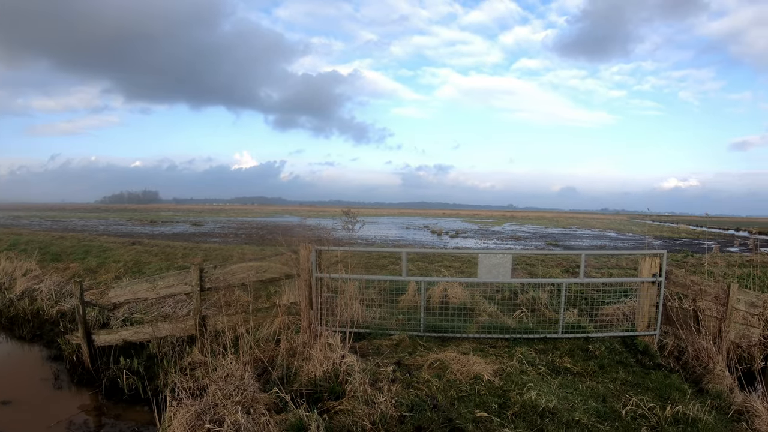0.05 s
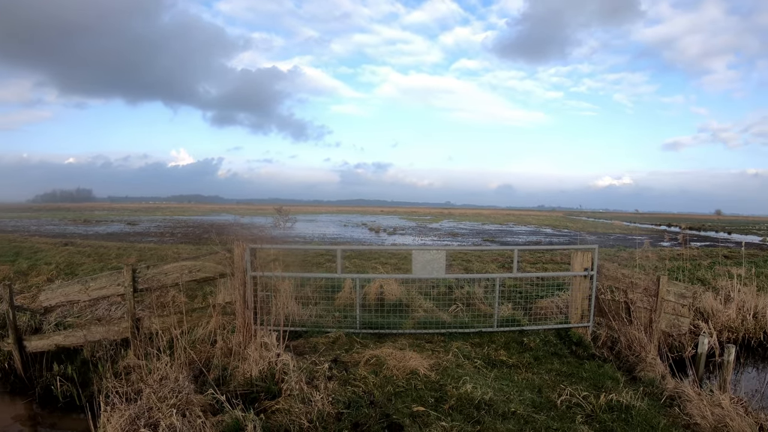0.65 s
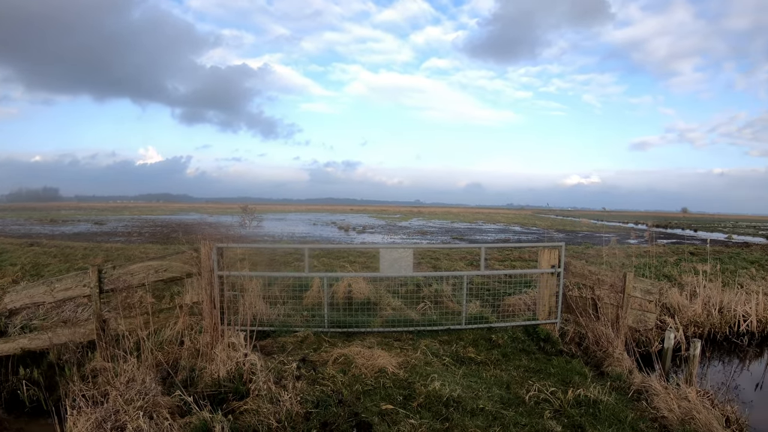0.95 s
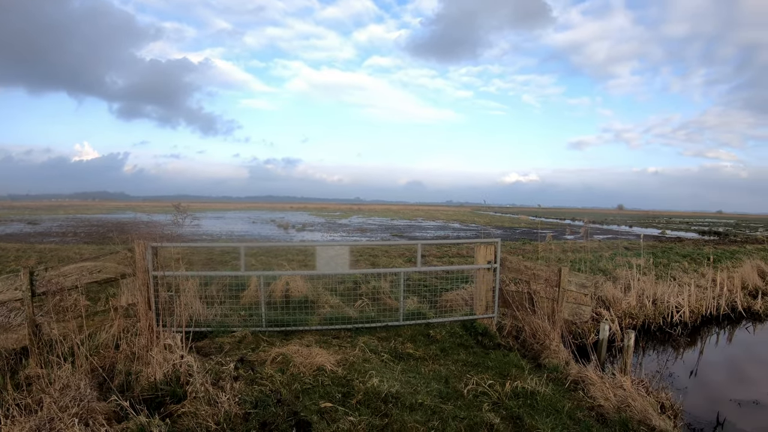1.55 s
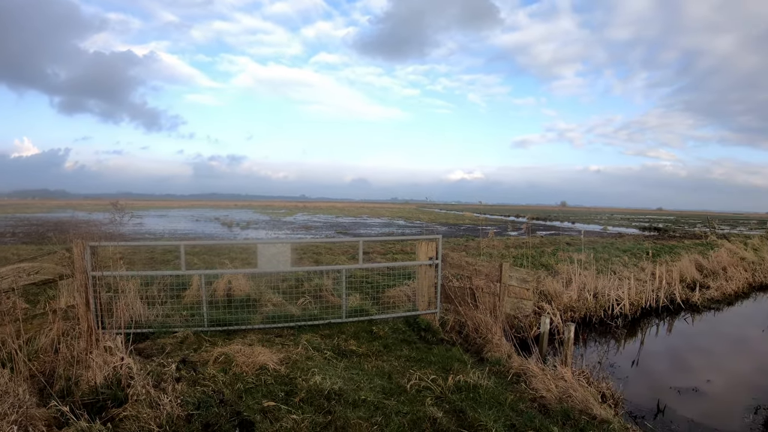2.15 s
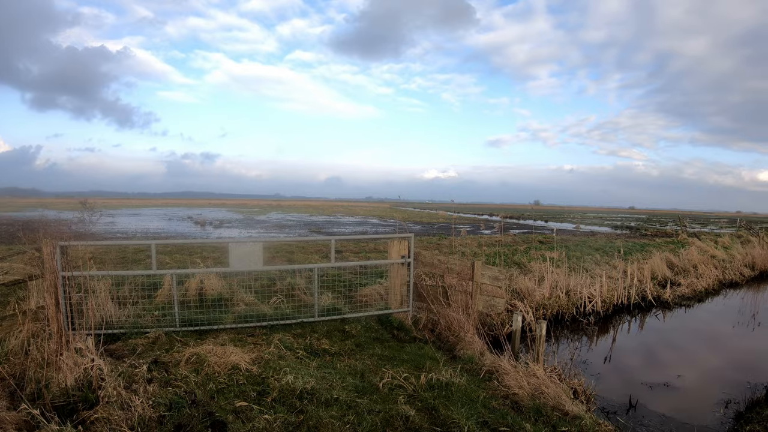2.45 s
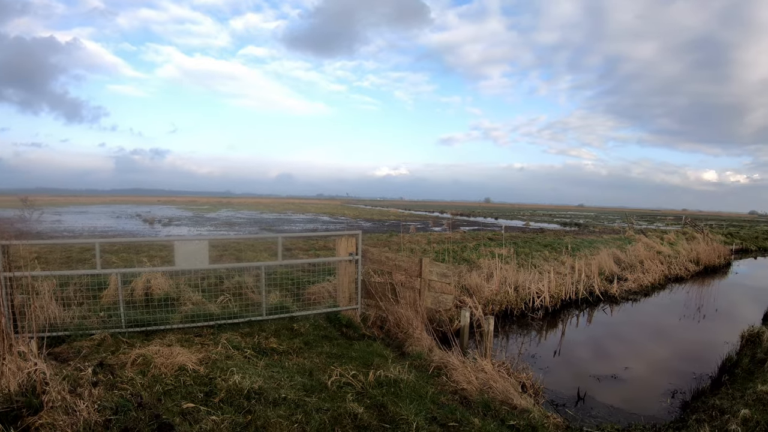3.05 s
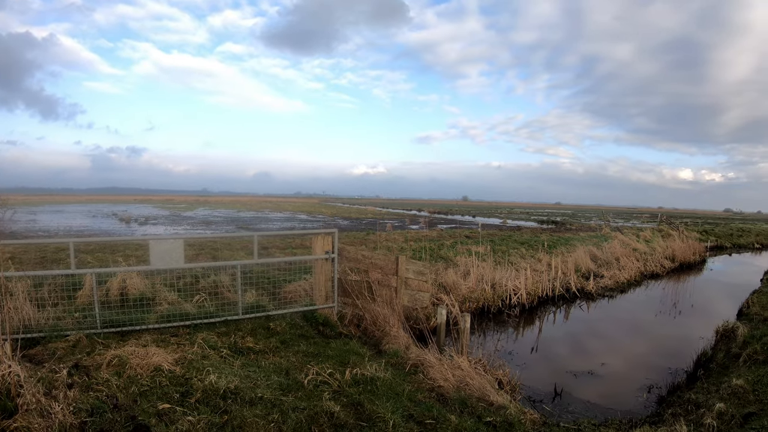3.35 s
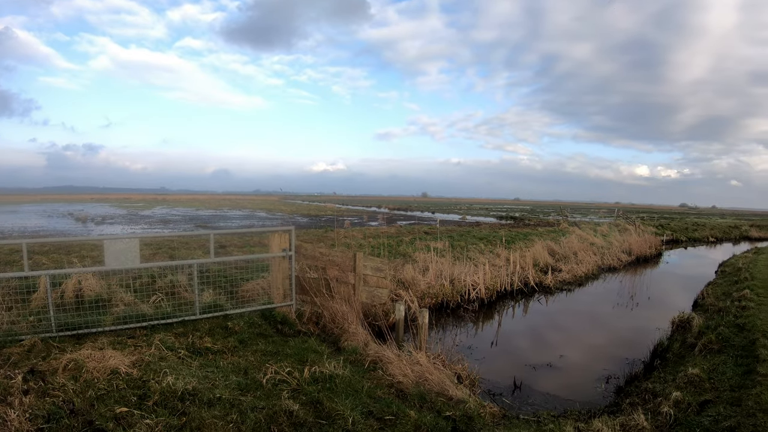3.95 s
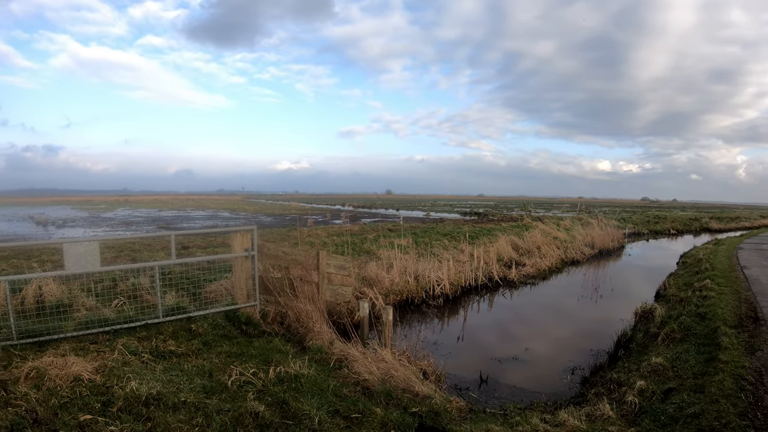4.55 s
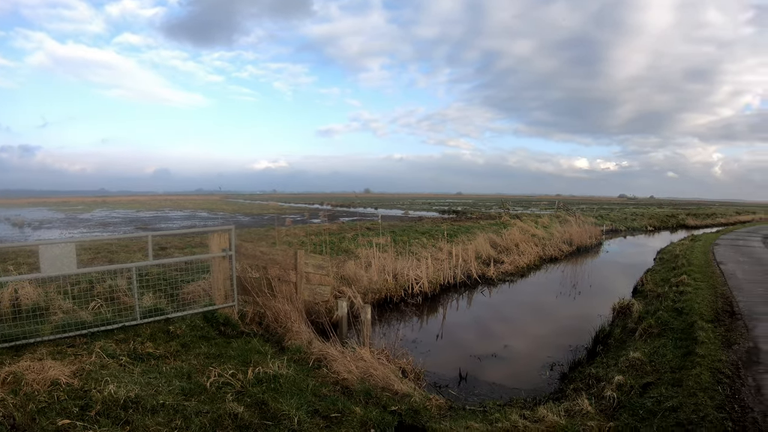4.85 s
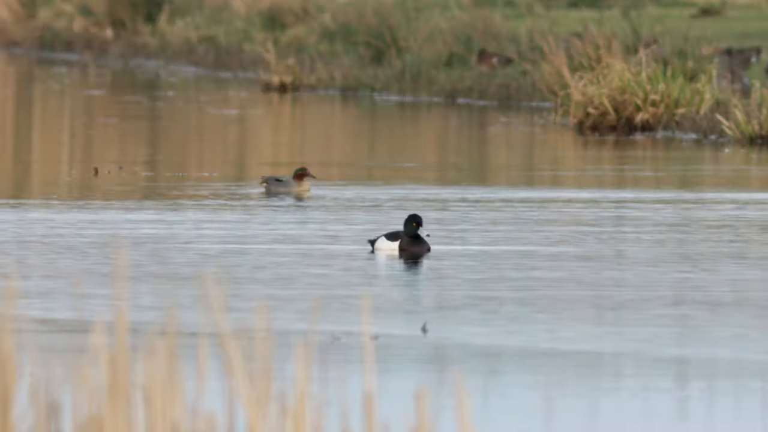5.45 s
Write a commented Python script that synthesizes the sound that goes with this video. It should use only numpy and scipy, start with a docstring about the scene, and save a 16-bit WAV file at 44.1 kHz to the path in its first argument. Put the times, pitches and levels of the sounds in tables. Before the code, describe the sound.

Geese call across wetland in quick, overlapping honks, some harsh, some squeaky, with more of the flock chattering far away. Low bumps knock against the hand-held microphone, mostly on the right and louder than the birds, over a light rumble of wind. The honking thins briefly, picks up again, then cuts off into near silence beside calm water.

```python
"""Geese over a marsh

Geese give short honks: a pulsing voice box rings the throat and beak, rasping at first and clearing as the
pitch falls. More birds murmur far off, over a low hum and a light breeze, and soft bumps shake a hand-held
camera's microphones. Near the end the scene changes to the hush of a still pond."""
import sys
import numpy as np
from scipy import signal
from scipy.fft import rfft, irfft, next_fast_len
from scipy.io import wavfile

SR = 44100
rng = np.random.default_rng(int(sys.argv[2]) if len(sys.argv) > 2 else 0)


def dump_mix(stems):
    """Bounce the given channels to the path in sys.argv[1] as a 16-bit WAV at rate SR."""
    frames = np.atleast_2d(stems).T  # one column per channel
    limited = np.clip(frames, -1, 1)  # hard clip at full scale
    pcm = np.round(limited * 32767).astype(np.int16)
    wavfile.write(sys.argv[1], SR, pcm)


N = 242991
TIME = np.arange(N) / SR
MARSH_END_S, MIC_LAG_S = 5.222, .000102

# the nearby honks: t/s, length/s, top pitch/Hz, level/dB, voice name
NEAR_HONKS = [(0, 0.11, 338.7, -61, "deep"), (0.129, .074, 709, -71.5, "yelp"),
              (0.248, 0.11, 793, -61.5, "yelp"), (0.334, .11, 391, -62.5, "dull"),
              (0.383, 0.097, 373, -64.5, "plain"), (.478, 0.14, 390, -57, "harsh"),
              (0.606, 0.094, 389.6, -59.5, "plain"), (0.71, 0.081, 835, -65.5, "reedy"),
              (0.872, 0.14, 389, -63, "plain"), (.953, .12, 362.6, -54, "nasal"),
              (1.048, 0.12, 396, -66.5, "dull"), (1.179, 0.097, 404, -58.5, "plain"),
              (1.224, .09, 426, -61.5, "plain"), (1.331, .11, 365.5, -54.5, "nasal"),
              (1.472, .108, 417, -57.5, "plain"), (1.678, .122, 368.3, -52.5, "nasal"),
              (1.771, 0.089, 393.4, -55.5, "plain"), (1.834, .067, 410, -63.5, "dull"),
              (2.028, .117, 365, -52, "nasal"), (2.202, .1, 532.6, -59, "plain"),
              (2.281, 0.095, 398.4, -56.5, "plain"), (2.373, .095, 412, -56, "plain"),
              (2.479, 0.097, 780, -65, "yelp"), (2.555, 0.093, 1120, -70, "shrill"),
              (2.62, 0.088, 399.6, -58, "plain"), (2.699, 0.13, 286.8, -59, "deep"),
              (2.91, .12, 393.7, -55, "harsh"), (2.962, 0.078, 1122, -67, "shrill"),
              (3.095, .17, 413, -65.5, "dull"), (3.36, .13, 425, -71, "reedy"),
              (3.515, .16, 419, -68.5, "dull"), (3.646, 0.13, 450, -64.5, "dull"),
              (3.829, 0.16, 840, -71.5, "yelp"), (3.949, 0.14, 451, -71.5, "dull"),
              (4.088, .12, 417, -65, "plain"), (4.194, .073, 417, -71, "plain"),
              (4.31, 0.077, 403, -67.5, "plain"), (4.339, .075, 316, -56.5, "cracking"),
              (4.543, .1, 862, -65.5, "whine"), (4.671, 0.071, 310.6, -59, "cracking"),
              (4.842, .093, 1002, -69.5, "squeak"), (4.893, .068, 309.5, -55.5, "cracking"),
              (4.994, 0.083, 418, -58.5, "plain"), (5.055, 0.072, 1013, -65, "squeak"),
              (5.145, .095, 393, -55, "harsh")]
# goose voices by name: place of the pitch top/0-1, pitch droop, roughness/0-1, throat resonance/Hz,
# its width/Hz, overtone level/dB, beak resonance/Hz, left minus right/dB
GOOSE_VOICES = {"nasal": (0.6, 0.8, .37, 1795, 225, -24, 5600, -10),
                "plain": (0.44, .76, 0.44, 1810, 330, -23.5, 3600, -7),
                "harsh": (0.53, .62, 0.7, 1807, 370, -26, 5900, -9.5),
                "deep": (0.5, 0.7, 0.3, 1800, 520, -37, 3500, -5),
                "dull": (0.3, 0.6, .56, 1468, 290, -23, 5400, -3.5),
                "cracking": (0.36, 0.56, 0.53, 1780, 700, -26, 3000, -9),
                "yelp": (0.63, 0.4, 0.4, 1760, 520, -26.5, 3500, -7),
                "reedy": (0.5, 0.4, .22, 1620, 450, -13.5, 3550, -5),
                "whine": (.12, .14, 0.4, 1620, 450, -12, 5900, -15),
                "squeak": (.5, 0.3, 0.1, 1980, 450, -16.5, 3300, -8),
                "shrill": (.2, 0.5, .14, 2120, 450, -9.5, 4400, -9.5)}
# the clean squeal of a cracking voice: same columns as a goose voice
SQUEAL_VOICE = (0.16, .3, .09, 2380, 950, -22.5, 5400, -10.5)
# how much of the honk's body the beak lets out: f/Hz, level/dB
BEAK_SPECTRUM = [(500, -55), (900, -16), (1250, -0.5), (1600, -0.5), (1850, 0), (2250, -1), (2550, -3),
                 (2750, -10), (3200, -21)]
# how much of the high overtones it lets out: f/Hz, level/dB
OVERTONE_SPECTRUM = [(2500, -17.5), (2950, 6), (3500, 3), (4600, -1), (5700, -2), (6700, -3.5), (8000, -12),
                     (11000, -39)]
# how the far chatter swells and fades: t/s, level/dB
CHATTER_SWELL = [(0, -5.5), (.45, 8), (.8, 1.5), (1.1, 7.5), (2, 0.5), (2.5, 6.5), (3.3, -4), (4.3, 1.5),
                 (5.2, 3.5)]
# bumps on the camera: t/s, level/dB, knock pitch/Hz, relative edge level/dB, relative rebound level/dB
CAMERA_BUMPS = [(0.095, -31.5, 202, -42, -25), (.125, -26.5, 200, -47, -20), (.931, -33, 181, -33, -12),
                (1.078, -21, 199, -13, -19), (1.651, -18.5, 201, -25, -7.5), (2.329, -23, 191, -32, -6),
                (2.339, -31, 189, -45, -23), (2.796, -33, 171, -21, -27), (2.961, -27, 203, -31, -14),
                (3.603, -32.5, 215, -35, -8), (3.638, -37, 215, -35, -16), (3.652, -34.5, 207, -23, -10.5),
                (3.814, -21, 163, -57, -14.5), (4.183, -40.5, 172, -40, -17.5),
                (4.339, -39.5, 199, -35, -8.5), (4.453, -16.3, 221, -10.5, -5.5), (4.514, -32, 250, -32, 0),
                (4.550, -17, 187, -16, -13), (4.725, -40.5, 194, -43, -12)]
# the tone of the open air: f/Hz, level/dB
AIR_SPECTRUM = [(20, 3), (33, 3), (45, 5.5), (65, -8), (110, -11), (170, 4.5), (230, -4), (370, -13.5),
                (540, -19.5), (780, -10), (1050, -22.5), (2000, -28.5), (3500, -39.5), (11000, -44),
                (15500, -53)]
# how alike the air sounds on the two sides: f/Hz, likeness/-1..1
AIR_STEREO_LIKENESS = [(60, -0.28), (110, -0.26), (190, -0.63), (800, -0.83), (1300, -0.4), (2000, -0.047),
                       (3500, 0.014), (16000, -0.015)]
# which side the air is louder on: f/Hz, left minus right/dB
AIR_BALANCE = [(30, -8), (90, -9.5), (140, -.5), (600, -1.5), (2000, -0.5), (8000, -1)]
# the tone of the pond's hush: f/Hz, level/dB
POND_SPECTRUM = [(20, 1.5), (60, -6.5), (300, -10.5), (1300, -16), (4000, -25), (9500, -29.5), (10500, -53)]


def honk(length, pitch, top, droop, rough, throat_hz, width_hz, overtones_db, beak_hz, size=8192):
    """One call: the voice box pulses, unevenly at first, and rings the throat and beak."""
    progress = np.minimum(np.arange(size) / (length * SR), 1)
    rasp = rough * (1.3 - .9 * progress)
    # the pitch scoops up as pressure builds, arches over and sags as it fades
    scoop = .1 * np.exp(-(progress / .16) ** 2)
    arch = 1.005 - droop * (progress - top) ** 2 - scoop - .09 * progress ** 5
    jitter = (.0056 + .03 * rasp) * wobble(size, 200)
    hz = pitch * arch * (1 + jitter + .0058 * wobble(size, 35))
    phase = 2 * np.pi * np.cumsum(hz) / SR
    pulses = unit(sum(np.cos(k * phase + k * k) for k in range(1, int(7500 / pitch))))
    # air hisses once a cycle, and uneven pulses make the voice rough
    hiss = rng.standard_normal(size) * (1 + np.cos(phase))
    source = pulses * (1 + .8 * rasp * wobble(size, 220)) + 2.4 * rasp ** 2 * hiss
    bark = 1 + .33 * np.exp(-((progress - .29) / .17) ** 2)
    swell = np.abs(np.sin(np.pi * progress ** .85)) ** 1.55 * bark
    # as the beak closes, the throat resonance sinks through three positions
    body = 0
    for position, centre_hz in zip(np.eye(3), throat_hz * np.array([1.085, 1, .915])):
        share = np.interp(progress, [.15, .45, .75], position)
        body += shaped(source * swell * share, lambda f: throat(f, centre_hz, width_hz))
    breathy = source + 2.4 * (1.1 + rough) * hiss
    overtones = shaped(breathy * swell ** .93, lambda f: beak(f, beak_hz))
    return (unit(body) + undb(overtones_db) * unit(overtones)) * np.sqrt(length * SR / size)


def throat(hz, centre_hz, width_hz, ring_hz=2530, ring_width_hz=79, ring_db=-19.5):
    """The throat favours one broad band of pitches; a narrow one above it adds a nasal ring."""
    main = 1 / np.hypot(1, 2 * (hz - centre_hz) / width_hz)
    ring = undb(ring_db) / (1 + (2 * (hz - ring_hz) / ring_width_hz) ** 2)
    return undb(read(BEAK_SPECTRUM, hz)) * (main + ring)


def beak(hz, centre_hz, width_hz=680):
    """The beak boosts the overtones near its own resonance."""
    resonance = 1 / (1 + (2 * (hz - centre_hz) / width_hz) ** 2)
    return undb(read(OVERTONE_SPECTRUM, hz)) * (.49 + resonance)


def placed_honk(length, pitch, db, voice):
    """One honk in a given voice, as the two microphones hear it."""
    *timbre, pan_db = voice
    return undb(db) * stereo(honk(length, pitch, *timbre), pan_db, MIC_LAG_S)


def near_geese(crack_after_s=.016, squeal_s=.076, squeal_ratio=4.13):
    """The calls that stand out. A cracking voice adds a squeal about two octaves up."""
    out = np.zeros((2, N))
    for start, length, pitch, db, voice in NEAR_HONKS:
        add(out, start, placed_honk(length, pitch, db, GOOSE_VOICES[voice]))
        if voice == "cracking":
            squeal = placed_honk(squeal_s, pitch * squeal_ratio, db - 4, SQUEAL_VOICE)
            add(out, start + crack_after_s, squeal)
    return out


def far_geese(count=100, level_db=-72, scatter_db=5):
    """Many faint honks from all over the marsh blend into a murmur."""
    out = np.zeros((2, N))
    for k, (when, long, high, rough, bright, loud, side) in enumerate(rng.random((count, 7))):
        call = honk(length=.0803 + .06 * long, pitch=350 * 2 ** (1.3 * high ** 2),
                    top=.3987, droop=.387, rough=.31 + .5 * rough,
                    throat_hz=826 + 700 * bright, width_hz=735, overtones_db=-21, beak_hz=3900)
        placed = stereo(call, pan_db=-1.6, lag_s=MIC_LAG_S * 2 * side)
        add(out, (k + when) / count * MARSH_END_S, undb(scatter_db * loud) * placed)
    return unit(out) * undb(level_db + np.interp(TIME, *np.transpose(CHATTER_SWELL)))


def marsh_echo(x, level_db=-15, fade_s=.23, size=32768):
    """Reeds, banks and water scatter a thin echo back."""
    t = np.arange(size) / SR
    envelope = undb(-60 * t / fade_s) * (1 - np.exp(-t / .0023))
    tail = unit(rng.standard_normal((2, size)) * envelope) / np.sqrt(size)
    return undb(level_db) * signal.fftconvolve(x[1:], tail, axes=1)[:, :N]


def bumps(rise_s=.0017, fall_s=.0033, sag_s=.021, edge_hz=420, lead_s=.02, left_db=-21, size=4096):
    """Each bump shakes mainly the right microphone: a hard edge, a sinking knock, a slow rebound."""
    out = np.zeros(N)
    t = np.arange(size) / SR - lead_s
    for start, db, hz, edge_db, rebound_db in CAMERA_BUMPS:
        phase = 2 * np.pi * hz * sag_s * (1 - np.exp(-t / sag_s))
        knock = -2 * np.cos(phase) / (np.exp(-t / rise_s) + np.exp(t / fall_s))
        edge = -np.cos(2 * np.pi * edge_hz * t) / np.cosh((t + .0013) / .00089)
        # hard contacts also scuff the case
        scuff = undb(-31) * unit(lowpass(rng.standard_normal(size), 1800)) / np.cosh(t / .0071)
        rebound_hz = 85 + .9 * (-17 - db)  # heavier bumps rebound more slowly
        late = t - .0171
        rebound = 2 * np.cos(2 * np.pi * rebound_hz * late)
        rebound /= np.exp(-late / .0024) + np.exp(late / .0085)
        bump = knock + undb(edge_db) * (edge + scuff) + undb(rebound_db) * rebound
        add(out, start - lead_s, undb(db) * bump)
    return np.array([-undb(left_db) * out, out])


def open_air(level_db=-53, gust_db=6, waver_db=1.56):
    """Distant hum and hiss, with a light breeze stirring the bass."""
    mid, side = rng.standard_normal((2, N))
    mid = shaped(mid, lambda f: np.sqrt(1 + read(AIR_STEREO_LIKENESS, f)))
    side = shaped(side, lambda f: np.sqrt(1 - read(AIR_STEREO_LIKENESS, f)))
    sign = np.array([[1], [-1]])  # left, right
    air = unit(shaped(mid + sign * side,
                      lambda f: undb(read(AIR_SPECTRUM, f) + sign * read(AIR_BALANCE, f) / 2)))
    breeze = lowpass(air, 100)
    hum = lowpass(air - breeze, 1200)
    hiss = air - breeze - hum
    gusts = undb(gust_db * np.minimum(wobble(N, 5.7), 1.2))
    waver = undb(waver_db * wobble(N, 9.2))
    return undb(level_db) * (breeze * gusts + hum * waver + hiss)


def pond(level_db=-83):
    """The faint hush of sheltered water."""
    noise = rng.standard_normal(N) + 2.3 * rng.standard_normal((2, N))
    return undb(level_db) * unit(shaped(noise, lambda f: undb(read(POND_SPECTRUM, f))))


def stereo(x, pan_db, lag_s):
    """The left microphone hears the wave a moment later and upside down."""
    left = -shaped(x, lambda f: np.exp(-2j * np.pi * f * lag_s))
    gains = unit(undb(np.array([pan_db, -pan_db]) / 2))
    return np.array([gains[0] * left, gains[1] * x])


def undb(db):
    """Turn decibels into a gain."""
    return 10 ** (np.asarray(db) / 20)


def unit(x):
    """Scale to an average power of 1."""
    return x / np.sqrt(np.mean(x ** 2) + 1e-30)


def read(points, hz):
    """Look up a frequency in a table, blending between rows on an octave scale."""
    freqs, values = np.transpose(points)
    return np.interp(np.log(hz + 1), np.log(freqs), values)


def shaped(x, gain):
    """Give each frequency its own gain."""
    size = next_fast_len(x.shape[-1] + 512)
    hz = np.arange(size // 2 + 1) * SR / size
    return irfft(rfft(x, size) * gain(hz), size)[..., :x.shape[-1]]


def lowpass(x, top_hz):
    """Keep what lies below about top_hz."""
    return shaped(x, lambda f: 1 / (1 + (f / top_hz) ** 4))


def wobble(size, rate_hz):
    """Random wavering, up to about rate_hz."""
    return unit(lowpass(rng.standard_normal(size), rate_hz))


def add(out, start, x):
    """Mix a sound in at its start time."""
    i = max(int(start * SR), 0)
    out[..., i:i + x.shape[-1]] += x[..., :max(N - i, 0)]


def scene(fade_s=.0069):
    """The marsh with its geese plays until the scene changes suddenly to the pond."""
    geese = near_geese() + far_geese()
    marsh = geese + marsh_echo(geese) + open_air() + bumps()
    marsh_share = np.clip((MARSH_END_S - TIME) / fade_s + 1, 0, 1)
    return marsh * marsh_share + pond() * (1 - marsh_share)


def record(dry):
    """Cut the highest treble, above 15.7 kHz."""
    return signal.sosfilt(signal.ellip(8, .2, 70, 15700, fs=SR, output="sos"), dry)


dry = scene()
out = record(dry)
dump_mix(out)
```